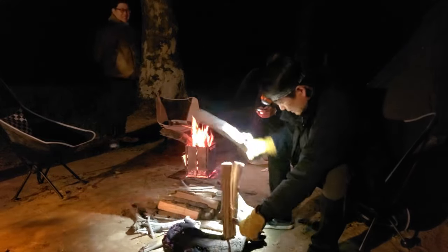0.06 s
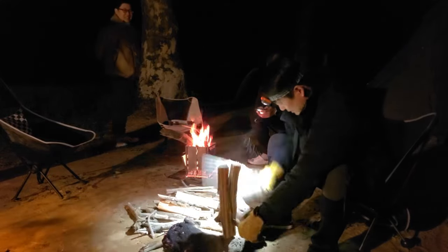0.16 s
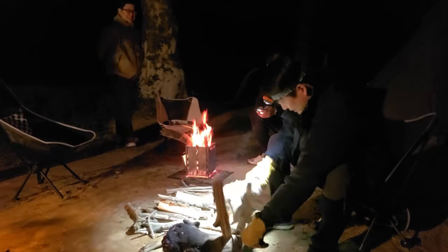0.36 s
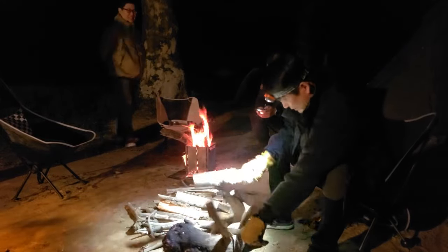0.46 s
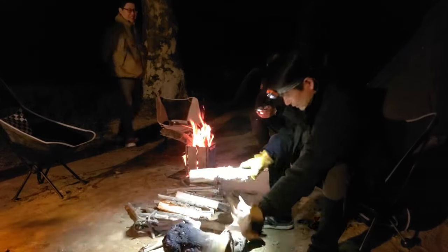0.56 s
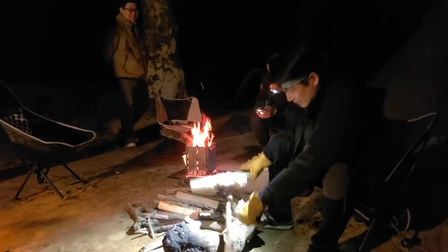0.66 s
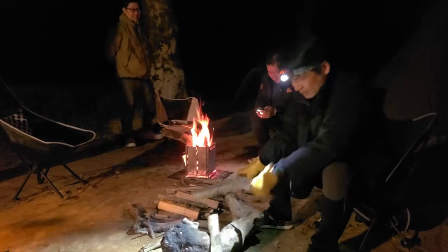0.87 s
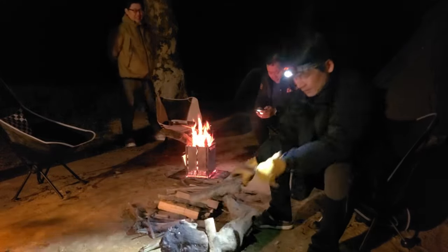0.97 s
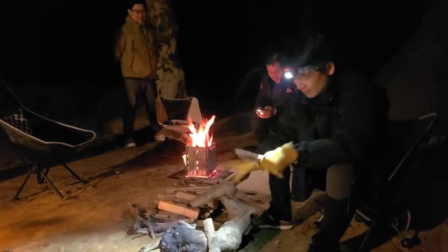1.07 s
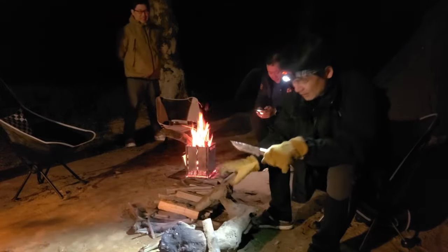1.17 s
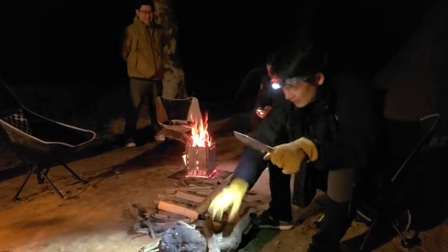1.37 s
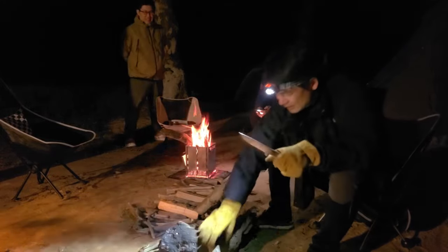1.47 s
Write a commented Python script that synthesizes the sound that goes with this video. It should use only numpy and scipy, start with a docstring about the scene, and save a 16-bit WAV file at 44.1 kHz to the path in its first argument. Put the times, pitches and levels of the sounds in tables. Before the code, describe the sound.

A single loud wood-splitting knock cracks sharply, then the split pieces topple and clatter on the ground

```python
"""A baton drives a knife through a log at a campsite: damped modes sound the wood, the block and the blade,
and bursts of grainy noise the tearing fibres. The split halves topple and knock about as shorter modal rings,
thuds and crunches; then a piece is dragged over the ground and picked up, as swells of hiss and resonance.
A small fire snaps nearby in bright noise bursts over the low rumble of the night, which is shaped noise;
trees and ground scatter a short tail, made by convolution with decaying noise."""
import sys
import numpy as np
from scipy import signal
from scipy.fft import rfft, irfft
from scipy.io import wavfile

SR = 44100
rng = np.random.default_rng(int(sys.argv[2]) if len(sys.argv) > 2 else 0)


def master(y):
    """Save y as 16-bit WAV."""
    cut = np.clip(np.atleast_2d(y).T, -1, 1)
    pcm = np.round(cut * 32767)  # scale
    wavfile.write(sys.argv[1], SR, pcm.astype(np.int16))


N = 66150
TIME, HZ = np.arange(N) / SR, np.fft.rfftfreq(N, 1 / SR)


def amp(db):
    """Amplitude ratio: twenty decibels are a factor of ten."""
    return 10 ** (np.asarray(db) / 20)


def unit(x):
    """Normalization by the root mean square, to rms 1."""
    return x / np.sqrt(np.mean(x ** 2) + 1e-20)


def read(points, hz):
    """Interpolation along a logarithmic frequency axis."""
    f, value = np.transpose(points)
    return np.interp(np.log(hz + 1), np.log(f + 1), value)


def add(mix, s, sound):
    """Superposition: a sound adds to the mix from its start time in seconds."""
    part = mix[..., round(s * SR):][..., :sound.shape[-1]]
    part += sound[..., :part.shape[-1]]


RING_RISE_S = 0.00093


def ring(modes, rise_s, pitch=1, tilt_db=0, length=1):
    """Modal synthesis: a struck body sounds as a sum of exponentially damped sines."""
    t = TIME[:SR // 2]
    swing = np.zeros(len(t))
    for k, (hz, db, t60) in enumerate(modes):
        level_db = db + tilt_db * np.log2(hz / 600)
        decay_db = -60 * t / (t60 * length)
        # each mode lies a quarter turn behind the one before
        swing += amp(level_db + decay_db) * np.sin(2 * np.pi * hz * pitch * t - k * np.pi / 2)
    return swing * (1 - np.exp(-t / rise_s))


NEAR_SPREAD = 0.55  # side to mid amplitude ratio


def noise(colour, tilt_db=0, grain_db=0):
    """Filtered noise: random amplitude makes the grain, a spectral gain the colour."""
    white = rng.standard_normal((2, N))
    grain = amp(grain_db * np.minimum(rng.exponential(1, N), 4))
    mid, side = white * grain
    stereo = np.array([mid + NEAR_SPREAD * side, mid - NEAR_SPREAD * side])
    tilt = tilt_db * np.log2(np.maximum(HZ, 1000) / 1000)  # acts above 1 kHz
    low_cut = HZ / np.hypot(HZ, 200)
    return unit(irfft(rfft(stereo) * amp(read(colour, HZ) + tilt) * low_cut, N))


GRAIN_DB, BURST_RISE_S = 2, 0.00018


def burst(colour, decay_s, tilt_db=0):
    """Crackling noise: a cluster of tiny fractures starts at once and dies exponentially."""
    envelope = (1 - np.exp(-TIME / BURST_RISE_S)) * np.exp(-TIME / decay_s)
    return noise(colour, tilt_db, GRAIN_DB) * envelope * np.sqrt(2)


# Modes of baton and log together. Each row: frequency in Hz, level in dB, t60 in seconds.
BATON_MODES = [(210, -11, 0.059), (350, -3, 0.014), (500, -8, 0.032), (702, -8, .028), (917, -6.5, 0.041),
               (1327, -4.5, 0.021), (1733, -28.5, 0.017), (2132, -12, 0.024)]


def baton_blow(out):
    """Impact excitation: the baton lands on the knife and sets baton and log ringing."""
    add(out, 0.2122, amp(-2.5) * ring(BATON_MODES, RING_RISE_S))


# Modes of the chopping block. Each row: frequency in Hz, level in dB, t60 in seconds.
BLOCK_MODES = [(87.4, -14, .16), (117, -8.5, 0.031), (160, -10.5, 0.077), (229.7, -24, 0.098),
               (402, -12.5, 0.039), (510, -13.5, 0.057), (607, -1, 0.038), (680, -6.5, .065),
               (869, -9, 0.067), (962, -11, 0.035), (1218, -10.5, 0.032), (1306, -22, 0.14),
               (1493, -14, 0.035)]


def block_slam(out):
    """Slower impact: the knife bottoms out on the block, whose modes rise more gently."""
    add(out, 0.2256, amp(-1.5) * ring(BLOCK_MODES, rise_s=0.0023))


# Fibres tear as the log splits. Each row: start in seconds, level in dB, decay time constant in seconds.
SPLITS = [(0.2124, -17.5, 0.0025), (.214, -7.5, 0.0026), (.218, -10.5, 0.0011), (0.2271, -18.5, 0.0026),
          (0.2305, -27.5, 0.0047)]
# Spectrum of tearing fibres. Each row: frequency in Hz, gain in dB.
SPLIT_COLOUR = [(300, -22), (1000, 8.5), (2200, -6), (3400, 3), (5500, -5.5), (8000, -6), (11500, -5.5),
                (16000, -10.5)]


def tearing_fibres(out):
    """Brittle fracture: each tear sounds as a short broadband burst."""
    for s, db, decay_s in SPLITS:
        add(out, s, amp(db) * burst(SPLIT_COLOUR, decay_s))


# Blade rings. Each row: start in seconds, level in dB.
CLINKS = [(.214, -17.5), (0.2179, -27), (1.1707, -49), (1.293, -54.5)]
# Modes of the steel blade. Each row: frequency in Hz, level in dB, t60 in seconds.
BLADE_MODES = [(1986, -2, 0.035), (2160, -3, 0.023), (2966, -4.5, 0.054), (3134, -4.5, 0.056),
               (3283, 4, 0.033), (3455, -2.5, 0.053), (3787, 7, 0.018), (4610, -1, 0.022),
               (5534, -5.5, .025), (7260, -5.5, 0.04), (9260, -10.5, 0.047), (11630, -3.5, 0.053)]


def blade(out):
    """Free vibration of a stiff steel blade: high modes ring at each clink."""
    for s, db in CLINKS:
        add(out, s, amp(db) * ring(BLADE_MODES, RING_RISE_S))


def chop():
    """Superposition of blow, slam, tearing fibres and ringing blade."""
    out = np.zeros((2, N))
    for source in (baton_blow, block_slam, tearing_fibres, blade):
        source(out)
    return out


# Modes of the ground under a knock. Each row: frequency in Hz, level in dB, t60 in seconds.
THUD_MODES = [(84, -0.5, 0.045), (113.6, 2, 0.082), (169.6, 3.5, 0.068), (228.6, 3.5, 0.049)]


def ground_thud():
    """Heavily damped low modes: the ground rises slowly and gives a dull thud."""
    return ring(THUD_MODES, rise_s=0.0047)


# Knocks of the pieces. Each row: start in seconds, ring level in dB, frequency ratio,
# tilt in dB per octave about 600 Hz, t60 ratio, ground thud level in dB.
KNOCKS = [(0.458, -46, 1.64, 2, 0.47, -52), (0.4743, -34.5, 1.41, -2.5, 0.47, -48),
          (.5348, -34, 1.205, -0.5, .55, -51), (0.6621, -20, 0.62, 2.5, 0.68, -18.5),
          (.686, -35, 0.92, -5, 0.51, -31), (0.7036, -19.5, 0.98, 1, 1, -22),
          (0.7116, -31.5, 1.02, -3.5, 1, -32), (0.7391, -28.5, 0.81, -1.5, 0.71, -24.5),
          (.7803, -22, 1, -3.5, 0.63, -43.5), (0.7951, -29, 0.92, 1.5, 0.84, -29),
          (.8218, -39, 0.95, -9, 0.67, -56), (0.9224, -30, 1.09, -0.5, 0.91, -47.5)]
# Modes of a split piece at ratios of 1. Each row: frequency in Hz, level in dB, t60 in seconds.
PIECE_MODES = [(242, -10, 0.1), (372, -3, 0.044), (463, -6, 0.044), (578.4, -0.5, 0.067), (697, -10, 0.031),
               (1032, -9.5, 0.032), (1439, -15.5, 0.053), (1595, -20.5, 0.061), (2020, -26, .04),
               (2675, -21, 0.074), (3580, -24, 0.035)]


def knocks(out):
    """Coupled impact: each knock excites the modes of the wood and of the ground together."""
    for s, db, pitch, tilt_db, length, thud_db in KNOCKS:
        add(out, s, amp(db) * ring(PIECE_MODES, RING_RISE_S, pitch, tilt_db, length))
        add(out, s, amp(thud_db) * ground_thud())


# The log settles on the ground after the blow. Each row: start in seconds, level in dB.
SETTLES = [(0.278, -32.5), (.319, -41), (.336, -47.5)]


def settling(out):
    """Weak impacts: the log excites only the ground modes."""
    for s, db in SETTLES:
        add(out, s, amp(db) * ground_thud())


# Splinters and grit crunch under the pieces. Each row: start in seconds, level in dB,
# decay time constant in seconds, tilt in dB per octave above 1 kHz.
CRUNCHES = [(0.458, -52, 0.0038, 0.5), (.52, -52, 0.0099, -3), (.532, -42, 0.0094, -10.5),
            (0.6607, -41.5, 0.0096, 0.5), (0.675, -41, .008, 0), (.686, -32, 0.0065, -0.5),
            (0.704, -30, 0.0029, 0.5), (0.7163, -36.5, 0.0028, 8), (0.722, -45.5, 0.012, 6.5),
            (0.7388, -36.5, 0.0043, 3.5), (0.751, -43.5, 0.0065, 3), (0.7804, -39.5, 0.0056, -6.5),
            (0.7862, -34, 0.011, -7), (0.9232, -37, 0.0014, -5.5)]
# Spectrum of the crunches before tilt. Each row: frequency in Hz, gain in dB.
CRUNCH_COLOUR = [(300, -1), (1000, -3.5), (1220, 5), (1500, 2), (1950, 1.5), (2250, -8), (2700, 3),
                 (3100, 0), (3600, 5), (4200, -7.5), (4900, -1), (6200, -10), (7300, -8.5), (9500, -11.5),
                 (11700, -8.5), (16000, -15)]


def crunches(out):
    """Granular crushing: splinters and grit break in short bursts of noise."""
    for s, db, decay_s, tilt_db in CRUNCHES:
        add(out, s, amp(db) * burst(CRUNCH_COLOUR, decay_s, tilt_db))


def pieces():
    """Superposition of wood knocks, thuds and crunches."""
    out = np.zeros((2, N))
    for source in (knocks, settling, crunches):
        source(out)
    return out


# Wood and gloves slide. Each row: middle in seconds, Gaussian spread in seconds, hiss level in dB,
# hiss tilt in dB per octave above 1 kHz, resonance level in dB, resonance frequency in Hz at the middle,
# glide in octaves per second.
SLIDES = [(0.283, 0.0298, -68.5, -6, -51, 998, 5.5), (.85, 0.074, -53.5, -2, -54, 1300, -3),
          (1.011, 0.0252, -45.5, -0.5, -47.5, 682.5, -4.5), (1.145, 0.094, -57, 0.5, -64, 1166, -3)]
# Spectrum of the hiss before tilt. Each row: frequency in Hz, gain in dB.
SLIDE_COLOUR = [(200, -3), (700, 3), (1300, 1.5), (2400, -1.5), (3500, -3.5), (6500, -15.5), (9000, -8.5),
                (12000, -16), (16000, -16)]
SLIDE_WIDTH_HZ = 113  # bandwidth of each of two equal poles


def slides():
    """Friction noise: gritty hiss and one gliding resonance swell and fade together."""
    out = np.zeros((2, N))
    pole = np.exp(-np.pi * SLIDE_WIDTH_HZ / SR)
    for s, spread_s, hiss_db, tilt_db, tone_db, hz, glide in SLIDES:
        octaves = glide * np.clip(TIME - s, -2 * spread_s, 2 * spread_s)
        turns = np.cumsum(hz * 2 ** octaves) / SR
        # narrow complex noise, shifted up to the gliding frequency
        white = rng.standard_normal(N) + 1j * rng.standard_normal(N)
        rub = signal.lfilter([1], np.poly([pole, pole]), white)
        tone = unit((rub * np.exp(2j * np.pi * turns)).real)
        hiss = noise(SLIDE_COLOUR, tilt_db, grain_db=2.5)
        swell = np.exp(-.5 * ((TIME - s) / spread_s) ** 2)
        out += swell * (amp(hiss_db) * hiss + amp(tone_db) * tone)
    return out


# The fire snaps. Each row: start in seconds, level in dB, left minus right in dB before the overall balance.
SNAPS = [(0.0516, -34, 4), (.4238, -42.5, 12.5), (1.123, -44, 6), (1.2496, -31, 2.5)]
# Spectrum of a snap. Each row: frequency in Hz, gain in dB.
SNAP_COLOUR = [(250, 4.5), (700, 1), (1500, -7), (2700, 3), (3900, -8), (5200, -3.5), (6500, -10.5),
               (8000, -0.5), (10000, -8.5), (13000, 4), (16000, -1)]


def fire():
    """Impulsive radiation: burning wood snaps in brief bright bursts, placed by level difference."""
    out = np.zeros((2, N))
    for s, db, pan_db in SNAPS:
        gain = amp([[db + pan_db / 2], [db - pan_db / 2]])
        add(out, s, gain * burst(SNAP_COLOUR, decay_s=0.0013))
    return out


# Likeness of the far sound. Each row: frequency in Hz, left-right correlation from 0 to 1.
LIKENESS = [(30, 1), (150, 0.98), (500, 0.56), (2000, 0.17), (15000, 0.13)]


def diffuse():
    """Diffuse-field coherence: spectra of far sound, alike left and right in the bass."""
    mid, side = rfft(rng.standard_normal((2, N)))
    same = np.clip(read(LIKENESS, HZ), 0, 1)
    mid, side = mid * np.sqrt(1 + same), side * np.sqrt(1 - same)
    return np.array([mid + side, mid - side])


# Decay of the tail. Each row: frequency in Hz, t60 in seconds.
TAIL_T60 = [(80, 0.43), (400, 0.13), (1200, 0.21), (4000, 0.25), (15000, 0.21)]
# Spectrum at the head of the tail. Each row: frequency in Hz, gain in dB.
TAIL_COLOUR = [(60, -1), (400, -6.5), (1200, -0.5), (3500, -1), (7000, -4.5), (15000, -3)]
TAIL_DB, TAIL_BUILD_S = -19, 0.012


def clearing(x):
    """Reverberation by convolution: trees and ground scatter a tail that decays band by band."""
    hz, t, z = signal.stft(irfft(diffuse(), N), SR, nperseg=256)
    decay_db = -60 * t / read(TAIL_T60, hz)[:, None]
    shaped = z * amp(read(TAIL_COLOUR, hz)[:, None] + decay_db)
    tail = signal.istft(shaped, SR, nperseg=256)[1][:, :N]
    tail = tail * (1 - np.exp(-(TIME / TAIL_BUILD_S) ** 2))
    tail = tail / np.linalg.norm(tail[0])  # unit energy on the left
    return amp(TAIL_DB) * signal.fftconvolve(x, tail, axes=1)[:, :N]


# Spectrum of the night. Each row: frequency in Hz, relative density in dB per Hz.
NIGHT_COLOUR = [(18, -25.5), (38, 0), (60, -5), (105, -12), (150, -11), (210, -23), (400, -26.5),
                (620, -23.5), (760, -32), (1100, -25), (1600, -30), (2300, -36.5), (3300, -30), (4400, -38),
                (5500, -37), (6300, -50.5), (7100, -46), (9000, -36.5), (10200, -43.5), (11600, -36),
                (13500, -43.5), (16000, -43)]
NIGHT_DB, NIGHT_WANDER_DB = -49.5, 2  # rms before the wander, rms of the wander


def night():
    """Shaped noise with slow modulation: low rumble and faint hiss wander in level below 10 Hz."""
    wander = unit(irfft(rfft(rng.standard_normal(N)) * (HZ < 10), N))
    rumble = unit(irfft(diffuse() * amp(read(NIGHT_COLOUR, HZ)), N))
    return rumble * amp(NIGHT_DB + NIGHT_WANDER_DB * wander)


BALANCE_DB = 0.87  # left minus right


def scene():
    """Linear superposition of near sounds, their tail and the night."""
    near = chop() + pieces() + slides() + fire()
    tail = clearing(near.mean(0, keepdims=True))
    return (near + tail + night()) * amp([[BALANCE_DB / 2], [-BALANCE_DB / 2]])


EDGE_HZ = 16100


def record(dry):
    """Soft saturation rounds the loudest peaks off at full scale; a low-pass then limits the band."""
    rounded = dry / (1 + dry ** 6) ** (1 / 6)
    low_pass = signal.firwin(255, EDGE_HZ, window=("kaiser", 8), fs=SR)
    return signal.oaconvolve(rounded, low_pass[None], "same")


dry = scene()
out = record(dry)
master(out)
```